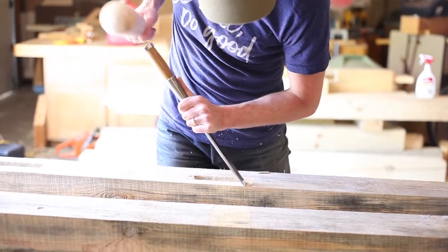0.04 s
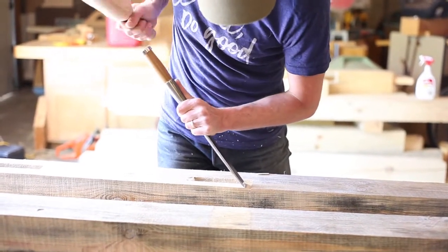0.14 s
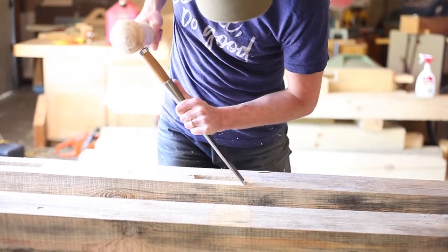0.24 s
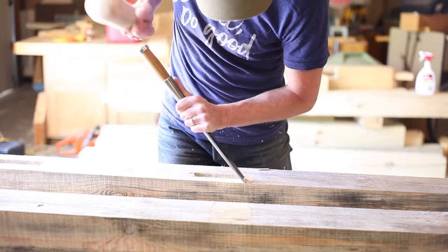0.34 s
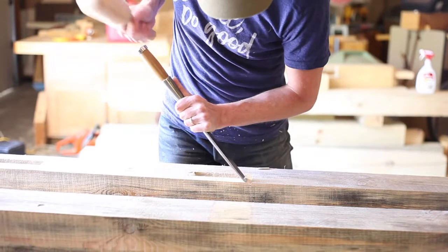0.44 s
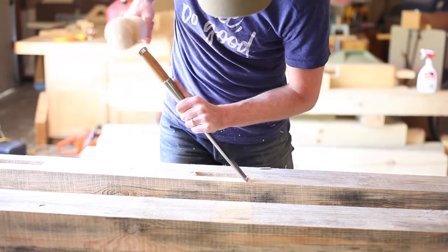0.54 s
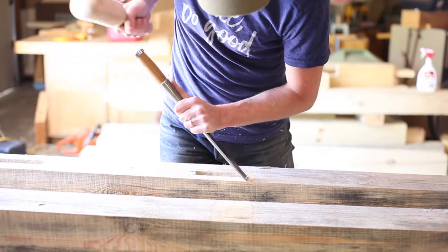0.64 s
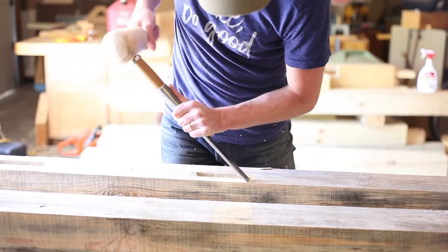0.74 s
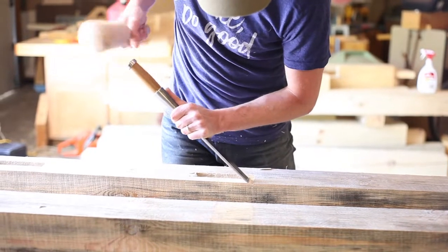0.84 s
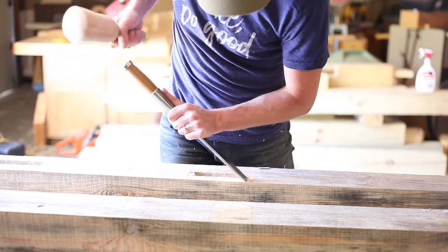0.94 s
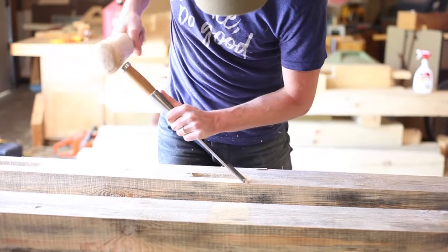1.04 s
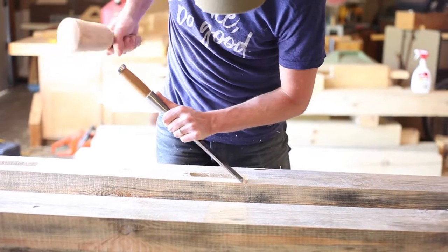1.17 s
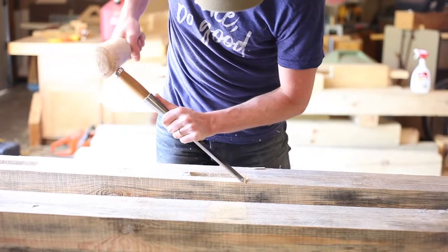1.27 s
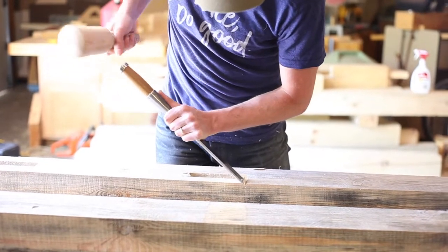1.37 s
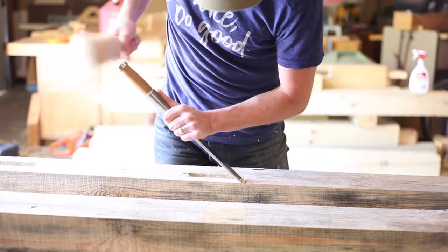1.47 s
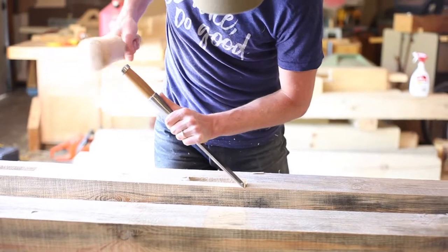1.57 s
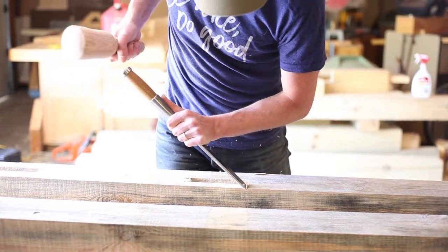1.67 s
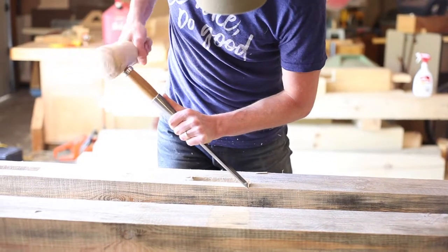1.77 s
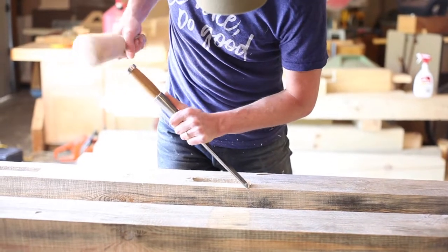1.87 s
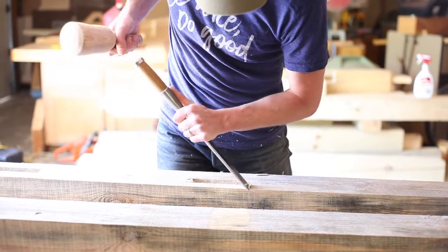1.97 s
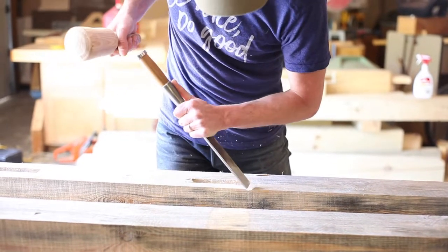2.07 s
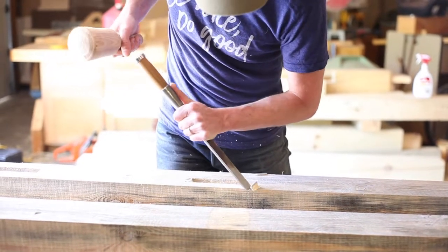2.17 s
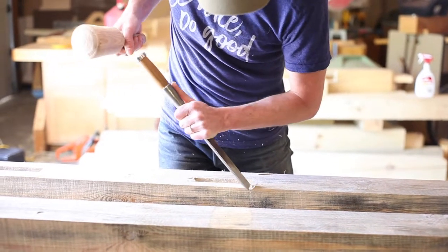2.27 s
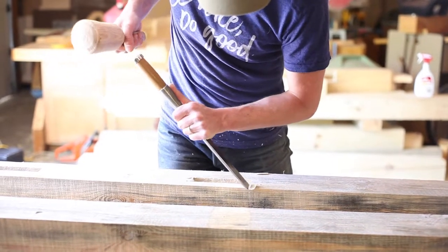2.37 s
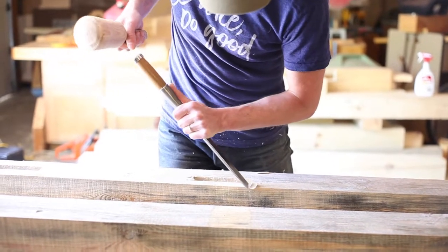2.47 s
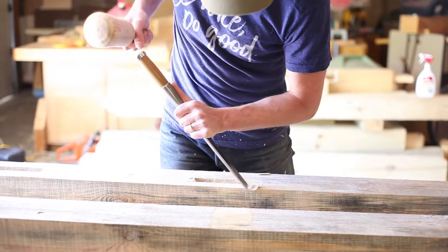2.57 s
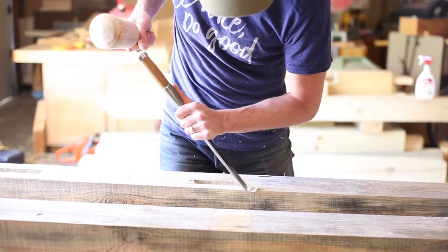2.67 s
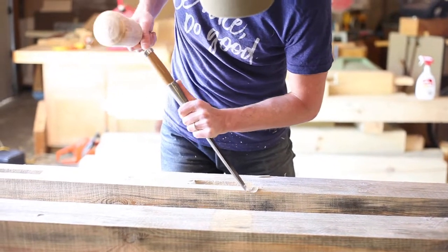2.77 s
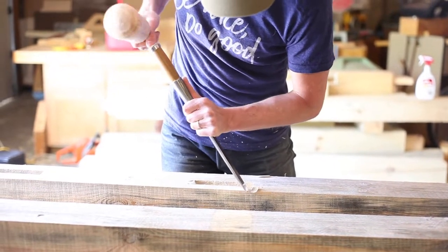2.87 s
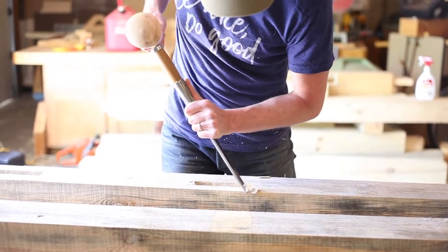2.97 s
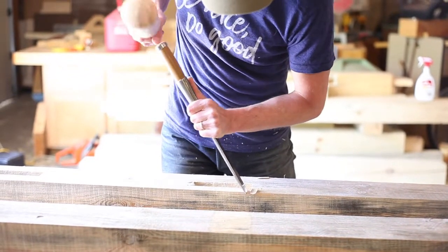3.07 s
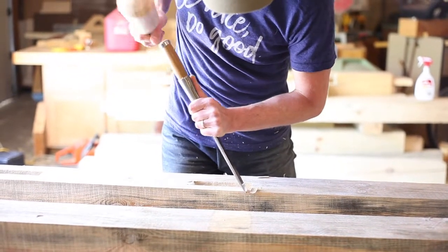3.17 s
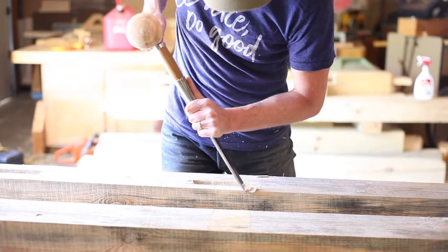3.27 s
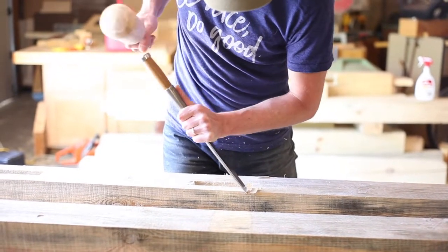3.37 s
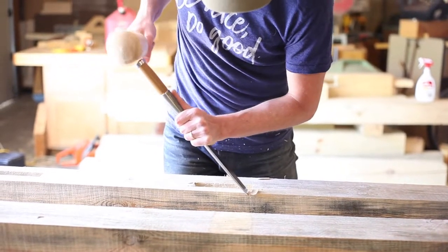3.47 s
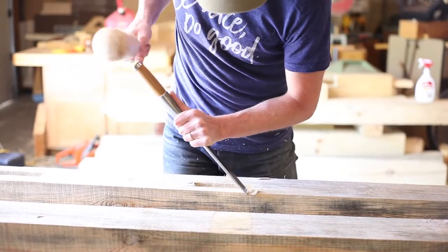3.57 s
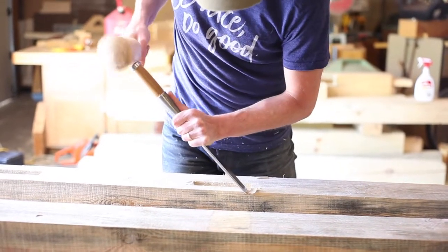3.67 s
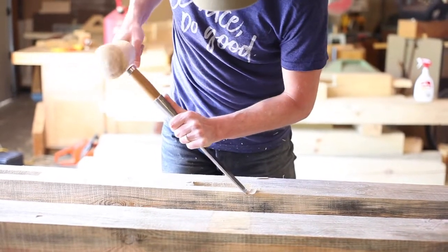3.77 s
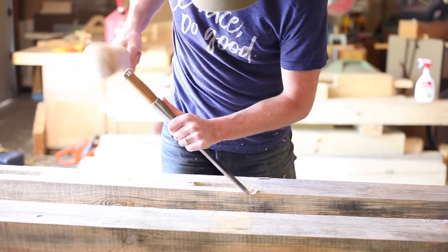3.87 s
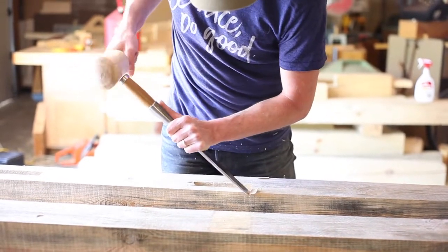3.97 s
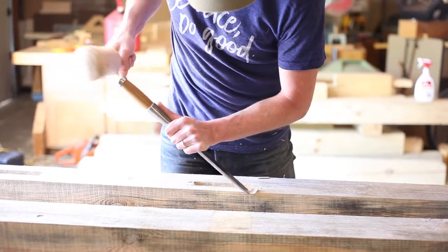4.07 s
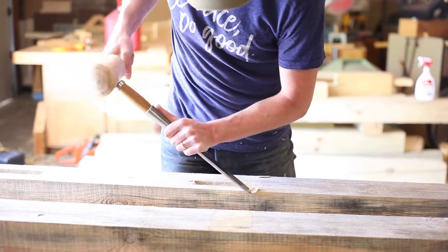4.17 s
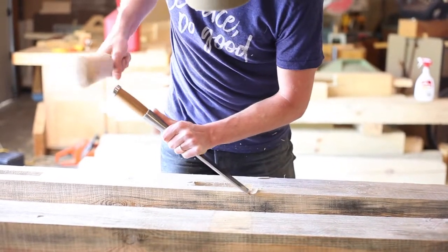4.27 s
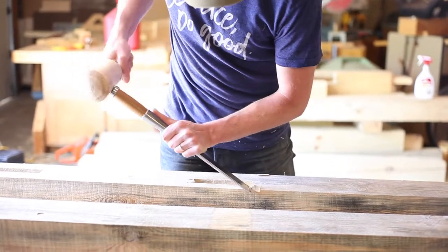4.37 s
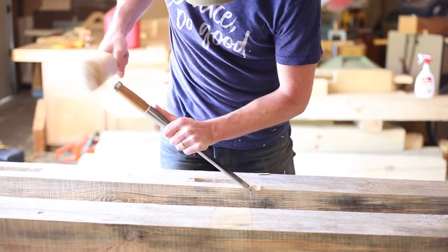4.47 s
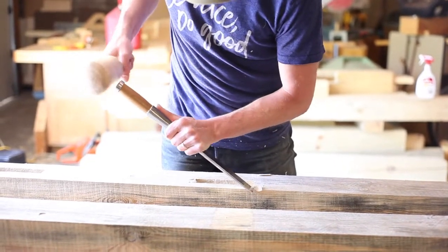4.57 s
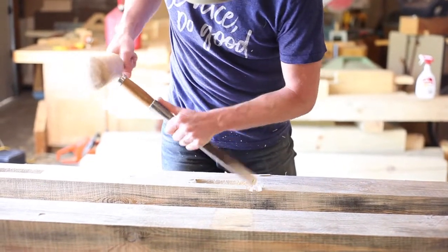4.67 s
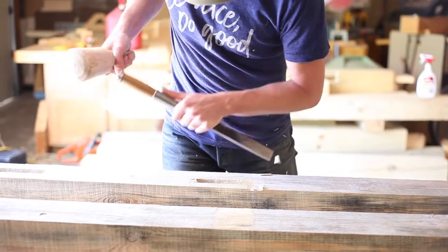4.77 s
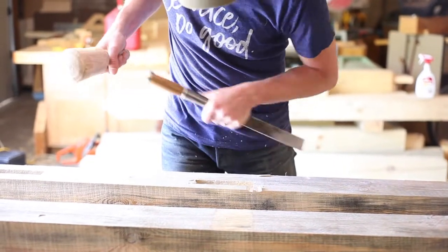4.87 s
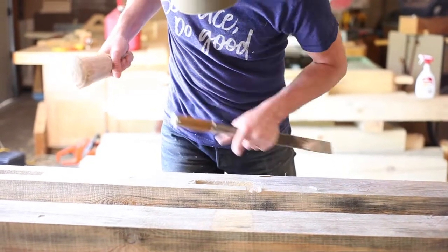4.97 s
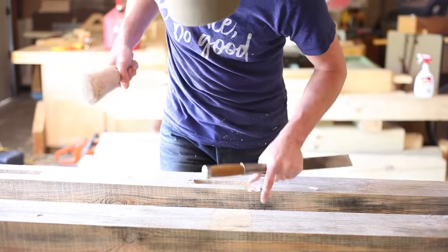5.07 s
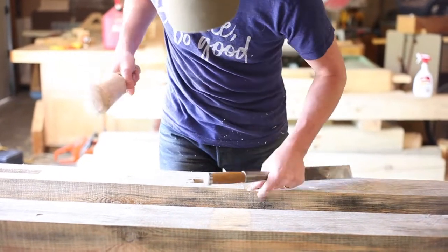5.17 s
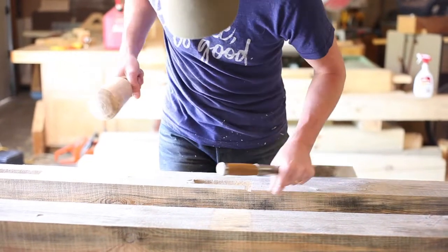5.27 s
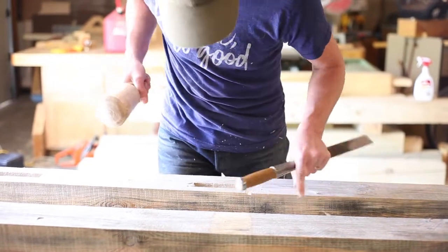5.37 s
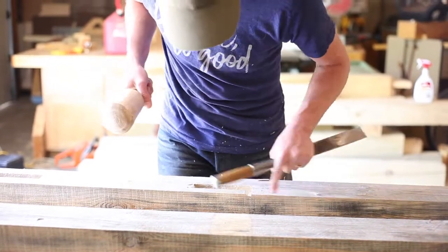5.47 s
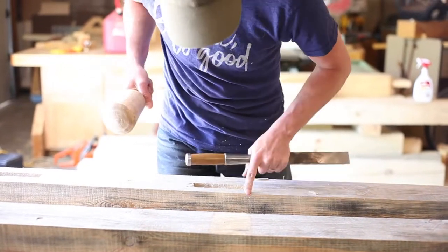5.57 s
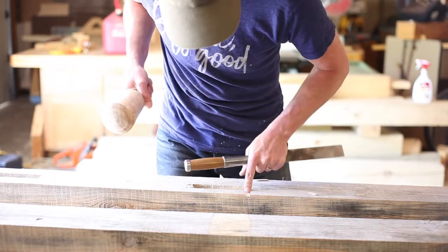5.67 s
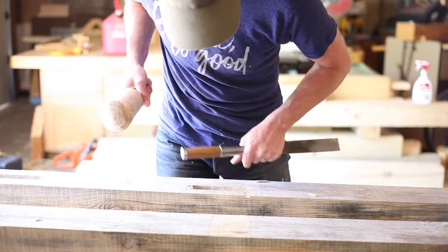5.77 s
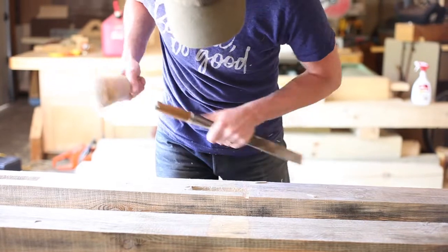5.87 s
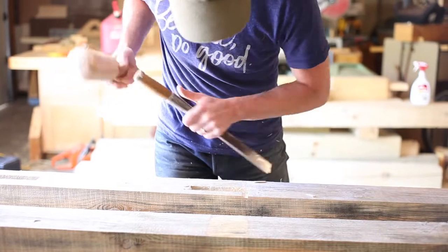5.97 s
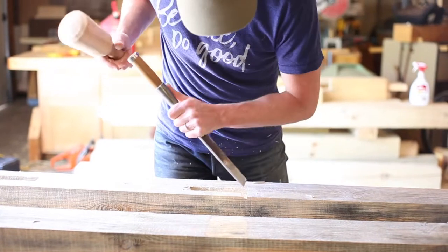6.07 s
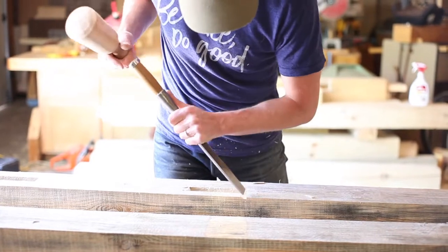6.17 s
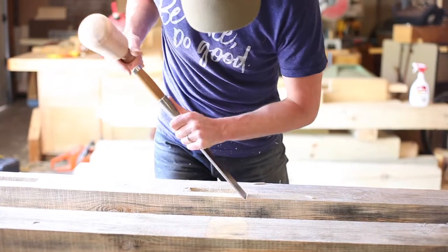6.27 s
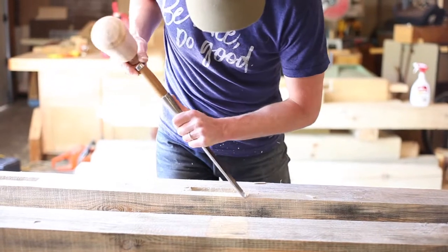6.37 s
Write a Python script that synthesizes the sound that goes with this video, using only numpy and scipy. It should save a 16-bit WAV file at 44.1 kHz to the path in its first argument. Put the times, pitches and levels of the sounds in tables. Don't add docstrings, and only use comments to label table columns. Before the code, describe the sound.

Seven sharp mallet blows on a chisel, a short pause with faint bird whistle, seven more, then light tapping and sweeping in a workshop.

```python
import sys
import numpy as np
from scipy import signal
from scipy.fft import rfft, irfft
from scipy.io import wavfile
from scipy.ndimage import uniform_filter1d

SR = 44100
rng = np.random.default_rng(int(sys.argv[2]) if len(sys.argv) > 2 else 0)


def wrap_up_sound(samples):
    columns = np.atleast_2d(samples).T
    tamed = np.clip(columns, -1, 1)
    steps = np.round(tamed * 32767).astype(np.int16)
    wavfile.write(sys.argv[1], SR, steps)


def attenuation_scalar(level_db):
    decades = np.asarray(level_db, float) / 20
    return 10 ** decades


N = 284004
LEAD = SR // 4
CHISEL_RESET_S = 2.5


def rms_one(x):
    return x / np.sqrt(np.mean(x ** 2) + 1e-20)


def at_hz(points, hz):
    points = np.array(points)
    return np.interp(np.log(hz), np.log(points[:, 0]), points[:, 1])


def filtered(x, order, hz, kind="low"):
    return signal.sosfilt(signal.butter(order, hz, kind, fs=SR, output="sos"), x)


def smoothed(x, time_s):
    keep = np.exp(-1 / (time_s * SR))
    return signal.lfilter([1 - keep], [1, -keep], x)


def noise():
    return rng.standard_normal(N + LEAD)


def rough(hz):
    return rms_one(filtered(noise(), 2, hz))


def coloured(spectrum, low_hz, high_hz):
    hz = np.maximum(np.fft.rfftfreq(N + LEAD, 1 / SR), 1)
    shaped = rfft(noise()) * attenuation_scalar(at_hz(spectrum, hz))
    part = irfft(shaped * (hz > low_hz) * (hz < high_hz), N + LEAD)
    return irfft(shaped, N + LEAD) / np.std(part)


def clock():
    return np.arange(N + LEAD) / SR - LEAD / SR


def window(start_s, length_s, edge_s):
    t = clock() - start_s
    return np.clip(np.minimum(t, length_s - t) / edge_s, 0, 1)


def swell(s, rise_s, t60):
    t = clock() - s
    return attenuation_scalar(np.where(t < 0, 9 * t / rise_s, -60 * t / t60))


def clicks(seconds, db):
    out = np.full(N + LEAD, 1e-18)
    out[np.round(np.asarray(seconds) * SR).astype(int) + LEAD] = attenuation_scalar(db)
    return out


def ring(x, hz, t60):
    r = attenuation_scalar(-60 / (t60 * SR))
    w = 2 * np.pi * hz / SR
    return signal.lfilter([1 / 2, 0, -1 / 2], [1, -2 * r * np.cos(w), r * r], x)


def struck(seconds, db, modes, spread_db, contact_s):
    scatter = spread_db * rng.standard_normal((len(seconds), len(modes)))
    out = 0
    for k, (hz, level_db, t60) in enumerate(modes):
        hits = clicks(seconds, db + level_db + scatter[:, k])
        out = out + (-1) ** k * ring(hits, hz, min(t60, .6))
    return smoothed(out, contact_s)


def crackle(seconds, db, t60, low_hz, build_s, high_hz=11500):
    envelope = signal.lfilter([1], [1, -attenuation_scalar(-60 / (t60 * SR))], clicks(seconds, db))
    bursts = smoothed(envelope, build_s) * noise()
    return filtered(filtered(bursts, 2, low_hz, "high"), 3, high_hz)


def blows(s, db, beam_db, top_db, crack_db, bend_db, contact_s):
    # frequency in Hz, level in dB, T60 in seconds.
    knock_modes = [(873, 1, 0.0094), (1006, 2, 0.013), (1258, 2, 0.016), (1397, 4, 0.018),
                   (1745, 3.5, 0.011)]
    top_modes = [(2146, -4, 0.034), (2515, -3.5, 0.022), (2704, -1, 0.015), (3074, 4, 0.01),
                 (3493, -1.5, 0.016), (4216, -13.5, 0.0077)]
    leaning_modes = [(310, 0, 0.017), (350, -8.5, 0.14), (407, -3.5, 0.068), (440, -4, 0.23),
                     (471, -2.5, 0.16), (493, -3, 0.36), (536, 6, 0.088), (545, -4, 0.14), (628, 5, 0.21),
                     (640, 2.5, 0.19), (678, 7, .15), (842, 0, 0.3), (1050, -2.5, 0.1), (1066, -3, 0.22)]
    steep_modes = [(273.5, 1, 0.009), (353.5, -12, 0.11), (430, -16, 0.16), (456.6, -8.5, 0.15),
                   (511, -1, 0.052), (599, -6, 0.13), (657.5, 0.5, 0.049), (684.3, -2, 0.21),
                   (791, -3.5, 0.05), (846, 2.5, 0.057), (948, -26, 0.48), (1152, -9, 0.091),
                   (1780, -13, 0.17)]
    bending_modes = [(70, -31, 0.035), (103, -14.5, 0.065), (140, -14.5, 0.14), (174.4, -10, 0.74),
                     (186.1, -3.5, .3), (222, 4.5, 0.05), (270, 2.5, .04), (318, -8.5, 0.056)]
    thump_modes = [(150, -29, .03), (240, -11, .03), (300, -18, .025)]
    hard_s, spread = .00002, 2.2
    back = s + 0.00299 + .002 * rng.random(len(s))

    knock = struck(s + 0.00058, db + 0.5, knock_modes, spread, contact_s)
    knock += struck(back, db - 2, knock_modes, 2 * spread, contact_s)
    knock += crackle(back, db - 8, t60=0.056, low_hz=600, build_s=0.0004, high_hz=1600)

    top = struck(s, db + top_db + 3.0, top_modes, spread, hard_s)
    top += struck(back, db + top_db - 9.0, top_modes, spread, hard_s)
    top += crackle(s, db + top_db + 2.5, t60=.03, low_hz=1900, build_s=0.00077, high_hz=3550)

    crack = crackle(s, db + crack_db + 0.5, t60=0.01, low_hz=2934, build_s=0.0003)
    crack += crackle(back, db + crack_db, t60=0.02, low_hz=2976, build_s=0.00031)
    crack += crackle(back, db + crack_db - 11, t60=0.14, low_hz=3500, build_s=.004)

    leaning = s < CHISEL_RESET_S
    beam = 0
    for some, modes in ((leaning, leaning_modes), (~leaning, steep_modes)):
        if some.any():
            beam = beam + struck(back[some], (db + beam_db)[some] - 1.5, modes, spread, contact_s)
    bending = struck(s + 0.0012, db + beam_db + bend_db + 6.0, bending_modes, spread, contact_s)
    bending += struck(s, db, thump_modes, spread, contact_s)
    return np.array([knock + top + crack + attenuation_scalar(-5.5) * beam, beam + bending])


def workshop(x, onset_s, late_db, late_stretch):
    # frequency in Hz, T60 in seconds.
    room_t60 = [(100, 0.95), (260, 0.45), (700, 0.41), (1800, 0.36), (4000, 0.34), (8000, 0.15),
                (15000, 0.082)]
    # frequency in Hz, level in dB.
    room_colour = [(100, -22), (260, -18.5), (700, -26.5), (1500, -42), (2200, -34.5), (3300, -39),
                   (5000, -35), (15000, -40.5)]
    t = np.arange(SR) / SR
    edges = 70 * 2 ** np.arange(0, 8.1, .5)
    response = 0
    for low, high in zip(edges, edges[1:]):
        band = filtered(rng.standard_normal(SR), 2, [low, high], "band")
        hz = np.sqrt(low * high)
        fall_db = -60 * t / at_hz(room_t60, hz)
        decay = attenuation_scalar(fall_db) + attenuation_scalar(late_db + fall_db / late_stretch)
        response = response + band * attenuation_scalar(at_hz(room_colour, hz)) * decay
    return signal.fftconvolve(x, response * np.clip(t / onset_s, 0, 1) ** 2)[:len(x)]


def background():
    # frequency in Hz, level in dB per Hz.
    tone_colour = [(88, -26.5), (150, 0), (302, -2), (600, -6), (1000, -8.5), (2290, -14.5), (4620, -18),
                   (15700, -22.5)]
    tone = filtered(coloured(tone_colour, 7000, 15000), 2, 90, "high")
    wind = rms_one(filtered(noise(), 2, [11, 80], "band"))
    gusts = attenuation_scalar(-55.5 + 3.5 * rough(hz=5.8))
    return attenuation_scalar(-64.5) * tone + gusts * wind


def pressed(loud):
    knee_db, share, attack_s, memory_s = -35.5, 0.67, .15, 0.55
    power = smoothed(smoothed(loud ** 2, attack_s), memory_s)
    return (1 + power / attenuation_scalar(2 * knee_db)) ** (-share / 2)


def ticks():
    # time in seconds, peak in dB, blade ring in dB.
    edge_ticks = [(0.1291, -59.5, -23), (0.3434, -54, -18), (1.9505, -52.5, 1), (1.9805, -46, 6.5),
                  (2.1409, -55.5, -7.5), (4.617, -52, -11), (4.629, -54, 8.5), (4.8982, -59.5, -22.5),
                  (5.1074, -54, -21), (5.2323, -51, -11), (5.6794, -45.5, -18), (5.7188, -34.5, -22),
                  (6.2322, -49, 3.5)]
    # frequency in Hz, level in dB, T60 in seconds.
    blade_modes = [(1620, 3, 0.041), (2650, -14.5, 0.022)]
    # time in seconds, frequency in Hz, level in dB, T60 in seconds.
    blade_rings = [(.422, 4300, -59.5, 0.63), (1.446, 6050, -50, 0.12), (1.951, 4230, -59, 0.089),
                   (2.919, 5440, -38.5, 0.049), (3.178, 5350, -22, 0.0084), (3.435, 5300, -54, 0.18),
                   (3.435, 4300, -65.5, .08), (3.863, 5130, -38.5, 0.057), (3.644, 5330, -29.5, 0.027),
                   (4.085, 5870, -43.5, 0.089), (4.085, 5260, -34, 0.04), (4.624, 2650, -48, 0.083),
                   (4.624, 4300, -61, 0.15), (4.624, 5360, -60, .15), (4.624, 6900, -56.5, 0.06),
                   (4.624, 8550, -62, .08), (4.624, 9700, -60, .1), (1.981, 2220, -49, 0.045),
                   (6.232, 5350, -62, 0.14)]
    # time in seconds, level in dB.
    chip_break = [
        (5.7185, -25),
        (5.7203, -26),
        (5.7235, -34),
    ]
    s, db, blade_db = np.transpose(edge_ticks)
    snaps = crackle(s, db + 1, t60=.04, low_hz=1200, build_s=.0005)
    blade = struck(s, db + blade_db + 5, blade_modes, spread_db=5.5, contact_s=.00002)
    rings = sum(ring(clicks([at], ring_db), hz, t60) for at, hz, ring_db, t60 in blade_rings)
    chip = filtered(clicks(*np.transpose(chip_break)), 1, 2500, "high")
    return snaps + blade + rings + chip


def drag():
    # start in seconds, length in seconds, level in dB.
    beam_hum = (2.0, 0.39, -63.5)
    # start in seconds, length in seconds, frequency in Hz, level in dB.
    blade_strokes = [
        (2.087, 0.23, 1653, -62),
        (2.36, 0.093, 1616, -61.5),
        (4.808, .1, 1620, -64),
        (4.92, 0.073, 1482, -60),
        (4.948, 0.117, 1600, -67),
        (5.802, 0.44, 1647, -57.5),
    ]
    turn = 2 * np.pi * clock()
    edge = 0.14
    start_s, hum_s, hum_db = beam_hum
    hum = window(start_s, hum_s, edge * hum_s) * attenuation_scalar(hum_db) * np.sin(184 * turn)
    hum *= .7 + .5 * rough(hz=7)
    strokes = sum(window(s, length, edge * length) * attenuation_scalar(db) * np.sin(hz * turn)
                  for s, length, hz, db in blade_strokes)
    return hum + (.5 + 0.89 * rough(hz=58.6)) * strokes


def bird():
    # start in seconds, length in seconds, from Hz, to Hz, level in dB.
    bird_glides = [(2.335, 0.047, 4500, 2940, -72.5), (2.388, 0.052, 2290, 2340, -82),
                   (2.442, 0.062, 2450, 3200, -75), (2.488, 0.045, 3220, 3010, -69.5),
                   (2.542, .025, 3056, 2580, -74), (2.572, 0.012, 3500, 4070, -68),
                   (2.588, 0.021, 3310, 4400, -70), (2.608, 0.028, 4320, 3120, -72),
                   (4.814, 0.027, 3500, 3450, -83.5), (4.964, 0.042, 3810, 3930, -72.5),
                   (5.013, .032, 3500, 4790, -68), (5.036, 0.13, 4890, 2640, -67.5)]
    out = np.zeros(N + LEAD)
    for s, length, from_hz, to_hz, db in bird_glides:
        t = np.arange(int(length * SR)) / SR
        bend = 1 + 6 * length
        hz = to_hz + (from_hz - to_hz) * (1 - t / length) ** bend
        edges = np.clip(np.minimum(t, length - t) / 0.0027, 0, 1)
        whistle = np.sin(2 * np.pi * np.cumsum(hz) / SR)
        out[int(s * SR) + LEAD:][:len(t)] += edges * attenuation_scalar(db - 67 * t) * whistle
    return (0.81 + 0.36 * rough(hz=150)) * out


def sweeps():
    # peak time in seconds, level in dB, rise in seconds, T60 in seconds.
    hand_strokes = [
        (5.221, -59, 0.047, 0.195),
        (5.672, -54, .035, 0.13),
        (5.735, -59.5, .006, 0.19),
    ]
    # frequency in Hz, level in dB per Hz.
    hiss_colour = [(200, -17), (600, 0), (1500, 6), (3000, -2), (8000, 1.5), (16000, -6.5)]
    hiss = coloured(hiss_colour, 5500, 14000)
    grain = attenuation_scalar(3 * rms_one(uniform_filter1d(noise(), size=50)))
    return sum(attenuation_scalar(db) * swell(s, rise_s, t60) for s, db, rise_s, t60 in hand_strokes) * hiss * grain


def scuffs():
    # time in seconds, frequency in Hz, level in dB, T60 in seconds.
    knuckle_taps = [
        (5.6563, 1330, -29.5, 0.019),
        (5.6801, 510, -27.5, 0.012),
    ]
    # time in seconds, level in dB, frequency in Hz, width in Hz, T60 in seconds.
    beam_rubs = [
        (5.658, -32.5, 1320, 120, 0.12),
        (5.68, -46.5, 502, 150, 0.027),
        (5.712, -71, 482, 100, 0.13),
        (5.18, -60, 1380, 203, 0.21),
        (5.234, -49, 2070, 1210, 0.015),
        (6.246, -42, 462, 50.5, 0.083),
    ]
    out = np.zeros(N + LEAD)
    for s, hz, db, t60 in knuckle_taps:
        out += ring(ring(clicks([s], db - 25.5), hz, t60 / 2), hz, t60)
    for s, db, hz, width_hz, t60 in beam_rubs:
        out += attenuation_scalar(db) * swell(s, .006, t60) * rms_one(ring(noise(), hz, 2.5 / width_hz))
    return out


def scene():
    # time in seconds, peak in dB, then beam, handle top and crack in dB relative to the peak.
    mallet_blows = [(0.1694, 3, -25, -13, -23.5), (0.4209, -3.5, -18.5, -9.5, -18),
                    (0.68, -7.5, -22, -8, -13.5), (0.9373, -8, -25, -9.5, -22.5),
                    (1.1902, -9, -21, -14.5, -34), (1.4451, -9.5, -16, -9, -34),
                    (1.694, -5.5, -20.5, -15, -46), (2.9178, -16, -6.5, -16, -20),
                    (3.1771, -4, -6.5, -15.5, -29.5), (3.4334, -6.5, -11, -19, -30.5),
                    (3.643, -7, -4.5, -18, -32.5), (3.8611, -8, -8.5, -16.5, -36),
                    (4.0841, -7.5, -13.5, -15.5, -28.5), (4.3185, -9, -8, -13.5, -27.5)]
    earlier_blow = (-.085, -9, -15, -15, -26)
    # time in seconds, peak in dB, beam in dB re peak, bending in dB re beam.
    soft_bumps = [
        (4.336, -11.5, -22, -40),
        (4.584, -27, -1, -5),
        (6.2326, -48, 0, 9),
        (6.25, -62, 1, 16.5),
    ]
    hits = np.transpose([earlier_blow, *mallet_blows])
    bend_db = np.where(hits[0] < CHISEL_RESET_S, 2, -9)
    s, db, beam_db, bump_bend_db = np.transpose(soft_bumps)
    driven = blows(*hits, bend_db, contact_s=.0001)
    bumped = blows(s, db, beam_db, -50, -55, bump_bend_db, contact_s=.00028)
    airborne, low_ring = driven + bumped
    rubbed = scuffs()
    near = airborne + ticks() + drag() + sweeps() + rubbed
    song = bird()
    into_room = near - .5 * rubbed + attenuation_scalar(24) * song
    room = workshop(into_room, onset_s=0.0025, late_db=-23.5, late_stretch=2.6)
    work = near + low_ring + room
    return (work + attenuation_scalar(7) * song + pressed(work) * background())[None, LEAD:]


def gain_control(x, knee_db, share, attack_s, release_db_s):
    back_db = release_db_s * np.arange(x.shape[1]) / SR
    over_db = np.maximum(20 * np.log10(np.abs(x) + 1e-9) - knee_db, 0)
    held_db = np.maximum(np.maximum.accumulate(share * over_db + back_db, axis=1) - back_db, 0)
    return x * attenuation_scalar(-smoothed(held_db, attack_s))


def band_limit(x):
    return signal.sosfilt(signal.butter(12, 15890, fs=SR, output="sos"), x)


def record(dry):
    thud = filtered(dry, 2, 14, "high")
    level = gain_control(thud, knee_db=-4.5, share=0.78, attack_s=.006, release_db_s=17)
    held = level / (1 + np.abs(level) ** 12) ** (1 / 12)
    cut = signal.sosfilt(signal.cheby2(10, 25, 16150, fs=SR, output="sos"), held)
    return band_limit(cut)


dry = scene()
out = record(dry)
wrap_up_sound(out)
```